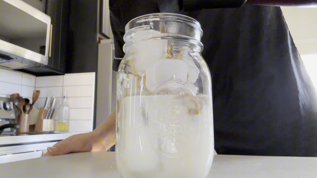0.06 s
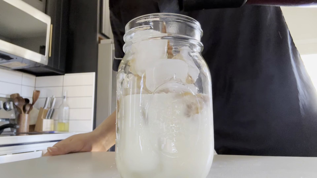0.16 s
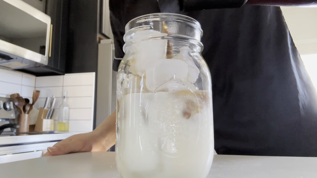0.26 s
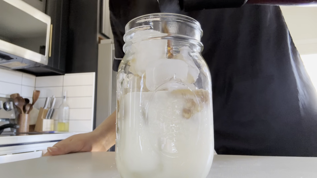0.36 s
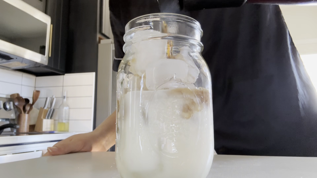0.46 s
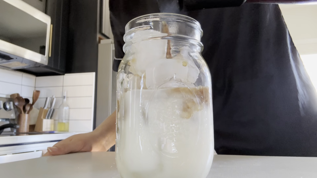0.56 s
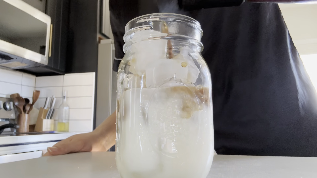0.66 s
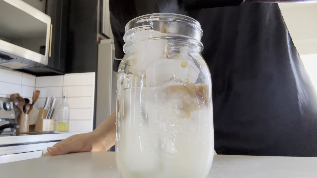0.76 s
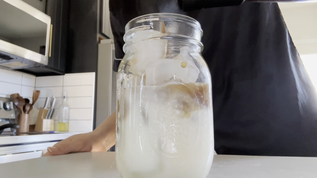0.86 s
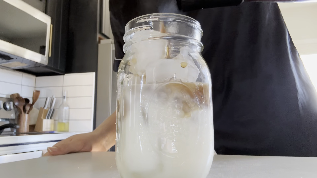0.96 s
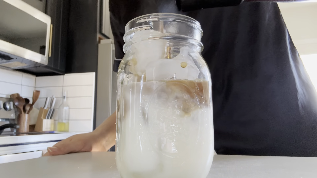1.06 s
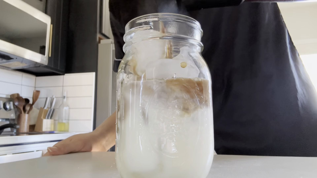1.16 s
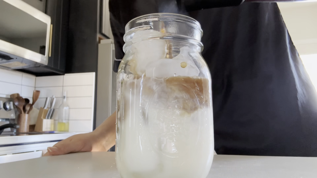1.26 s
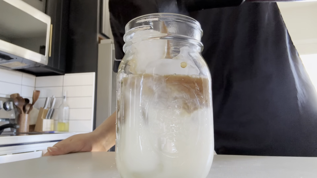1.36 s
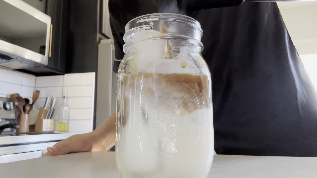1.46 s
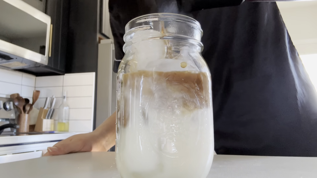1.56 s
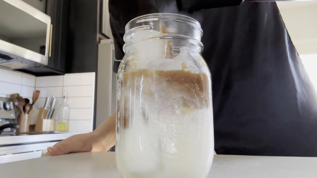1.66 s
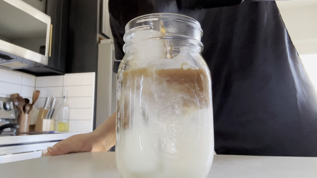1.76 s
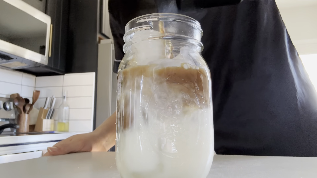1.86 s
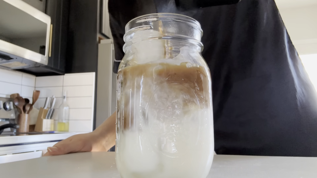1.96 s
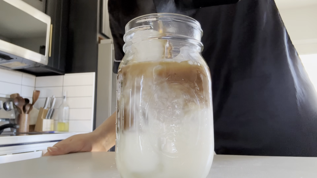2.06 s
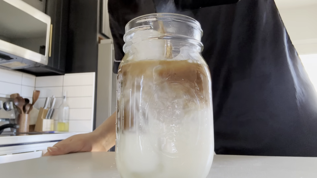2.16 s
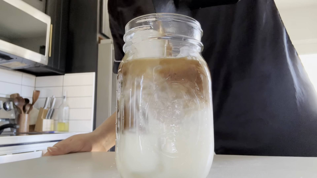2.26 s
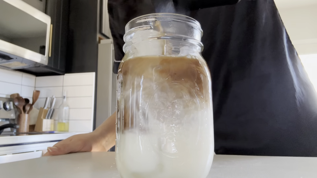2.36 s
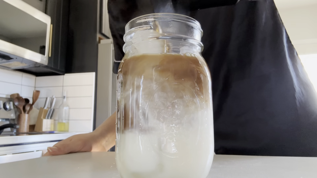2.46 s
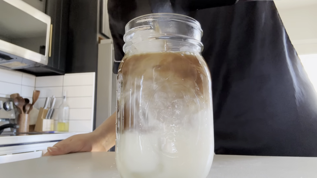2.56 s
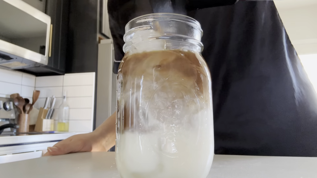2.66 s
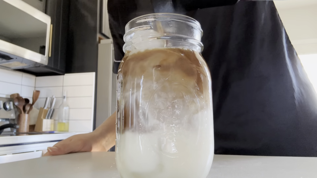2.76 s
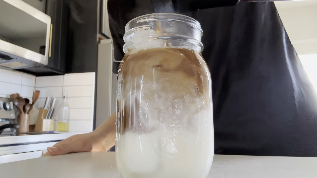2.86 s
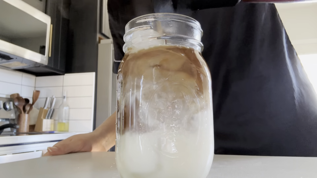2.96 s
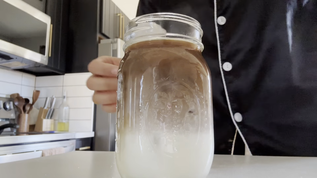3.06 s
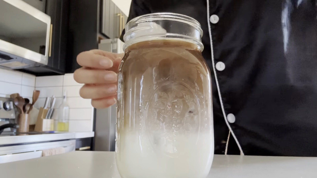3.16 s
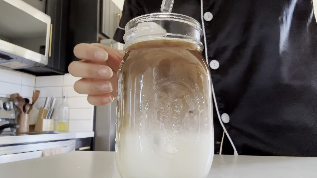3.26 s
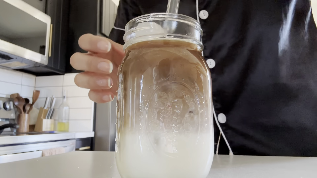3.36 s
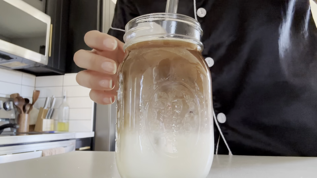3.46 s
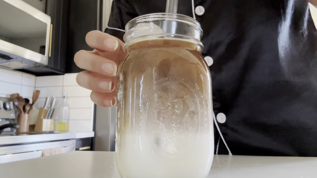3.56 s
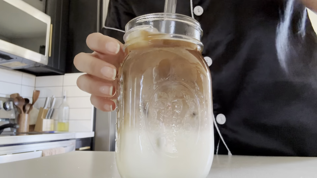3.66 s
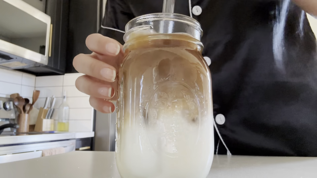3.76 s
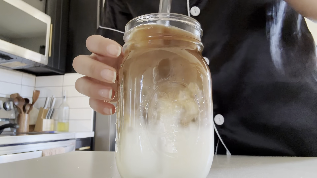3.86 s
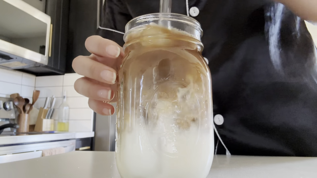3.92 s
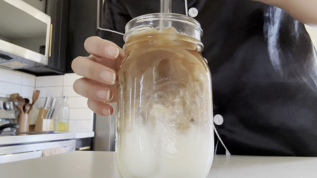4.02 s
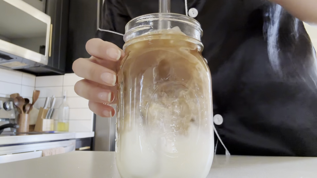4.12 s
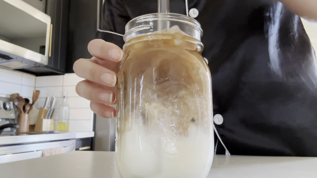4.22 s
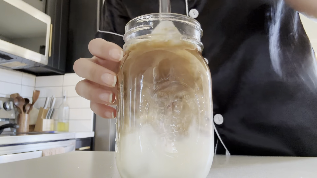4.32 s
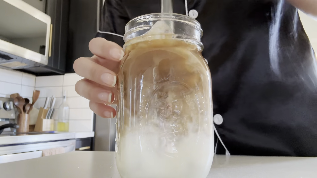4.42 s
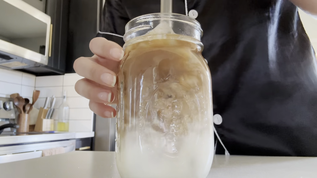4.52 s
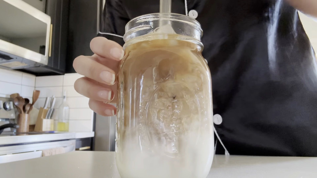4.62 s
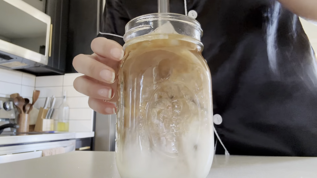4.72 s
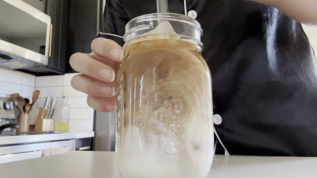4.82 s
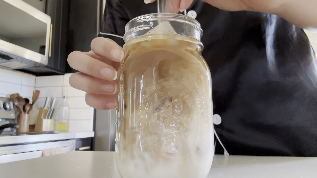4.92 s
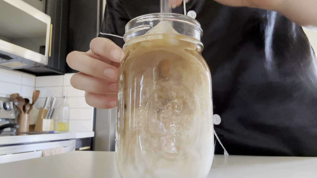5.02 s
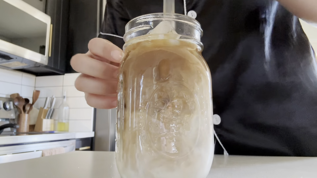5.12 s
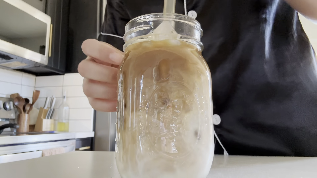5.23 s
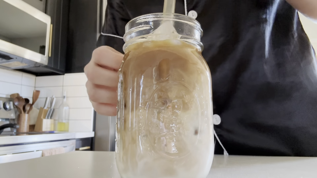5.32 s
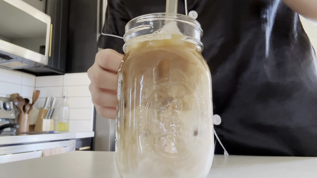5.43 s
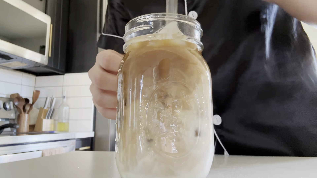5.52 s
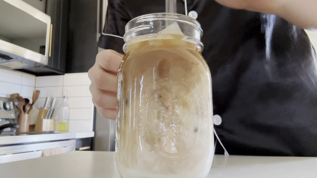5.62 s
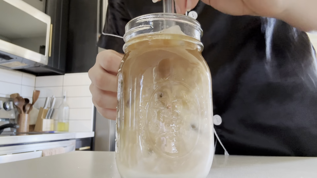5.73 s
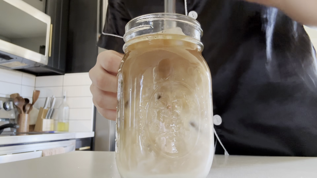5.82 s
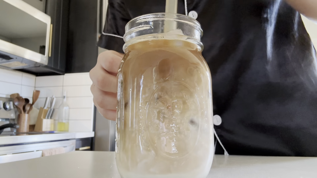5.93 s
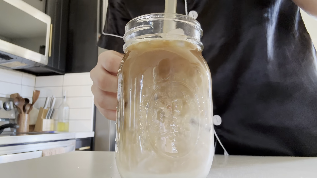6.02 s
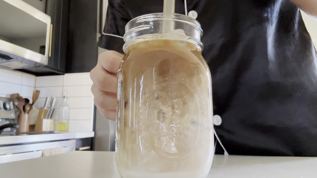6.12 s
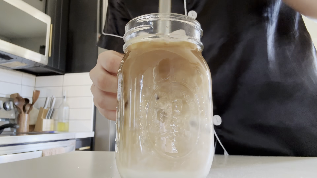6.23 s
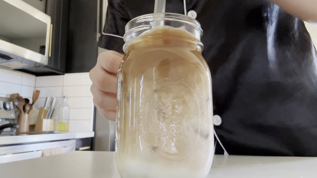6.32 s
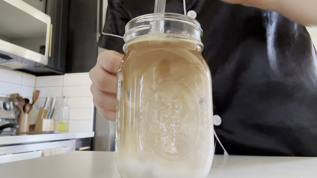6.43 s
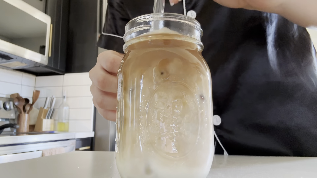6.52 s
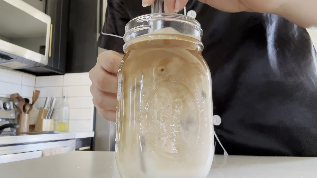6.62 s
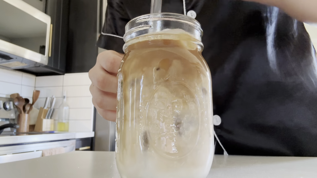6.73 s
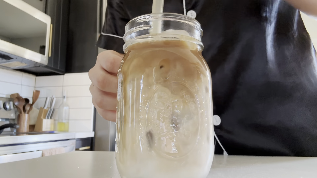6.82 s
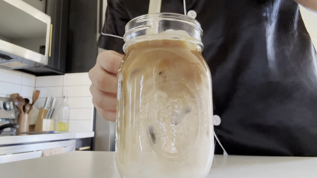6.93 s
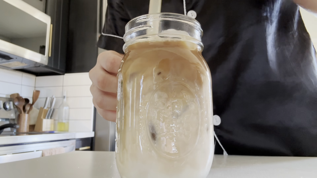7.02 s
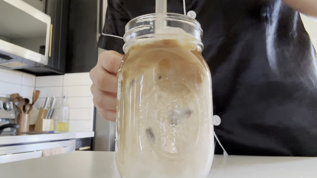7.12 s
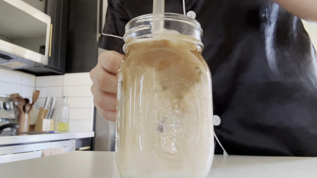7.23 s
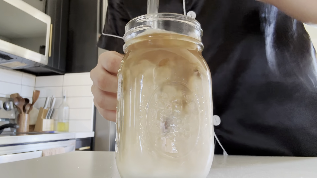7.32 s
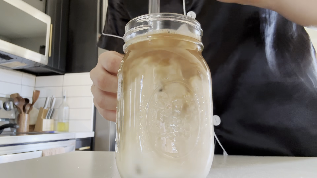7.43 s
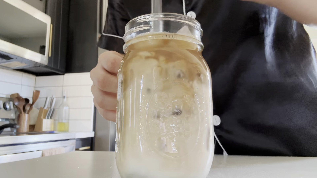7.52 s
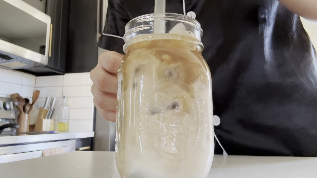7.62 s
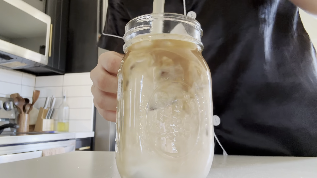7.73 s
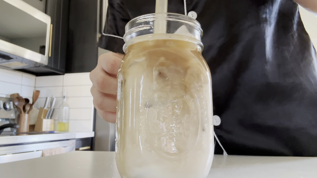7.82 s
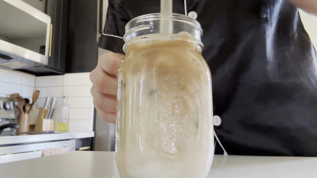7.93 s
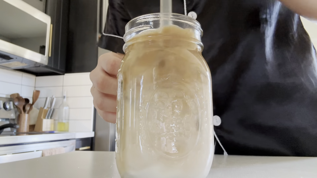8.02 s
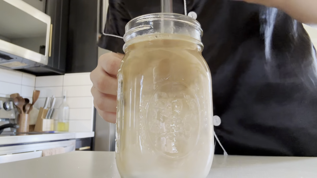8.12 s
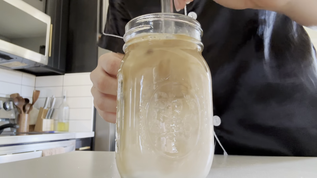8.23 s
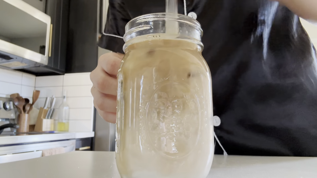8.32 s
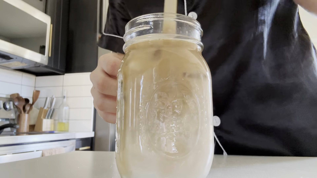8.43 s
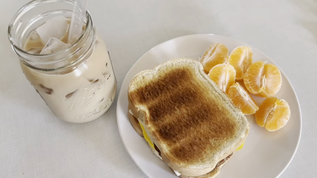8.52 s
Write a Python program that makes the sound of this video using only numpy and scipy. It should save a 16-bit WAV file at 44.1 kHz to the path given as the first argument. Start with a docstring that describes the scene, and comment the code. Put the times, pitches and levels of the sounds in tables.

```python
"""On a kitchen counter, coffee trickles in gushes over ice and milk in a glass jar; then the pot is put down.
Bubbles are decaying sines of rising pitch; the stream is noise bursts through resonances of the air space.
A glass straw stirs in short strokes: contact noise excites modes of cubes, straw, wall and jar bottom.
The jar knocks on the counter as decaying sines of falling pitch, with a boom and a clack.
Reflections in decaying noise bands make the small room ring briefly; an appliance hums in steady sines."""
import sys
import numpy as np
from scipy import signal
from scipy.fft import rfft, irfft, next_fast_len
from scipy.io import wavfile

SR = 44100
rng = np.random.default_rng(int(sys.argv[2]) if len(sys.argv) > 2 else 0)


def inscribe(sig):
    """Save sig as 16-bit PCM at rate SR to the path in sys.argv[1].

    A 1-D sig is mono; a 2-D sig holds one channel per row.
    Samples are clipped to [-1, 1] before scaling.
    """
    pcm = np.round(np.clip(np.atleast_2d(sig).T, -1, 1) * 32767)
    wavfile.write(sys.argv[1], SR, pcm.astype(np.int16))


N = 378378
TIME = np.arange(N) / SR
SHORT = np.arange(4096) / SR   # clock of a single hit, s
LEAD_S = 0.01   # contact noise peaks this long after its clock starts


def from_db(db):
    """Decibel law: amplitude ratio of a level."""
    return 10 ** (np.asarray(db) / 20)


def rms_one(x):
    """Power normalization: rms 1 over the whole signal."""
    return x / np.sqrt(np.mean(x ** 2) + 1e-20)


def energy_one(hits):
    """Energy normalization: each hit carries the energy of rms 1 lasting a hundredth of a second."""
    energy = np.mean(np.sum(hits ** 2, -1), -1)[:, None, None]
    return hits / np.sqrt(energy / (SR / 100) + 1e-20)


def peak_one(hits):
    """Peak normalization: the largest swing of each hit is 1."""
    return hits / np.abs(hits).max((1, 2), keepdims=True)


def pan(db):
    """Level-difference stereo: left exceeds right by db."""
    return from_db(np.array([[db], [-db]]) / 2)


def per_hit(rows):
    """Event columns for parallel synthesis, each shaped (events, 1, 1)."""
    return np.transpose(rows)[:, :, None, None]


def in_time(rows):
    """Linear interpolation of a table's columns along its times."""
    s, *columns = np.transpose(rows)
    return [np.interp(TIME, s, c) for c in columns]


def at_hz(points, hz, axis=1):
    """Interpolation of a table column on a logarithmic frequency scale."""
    points = np.array(points)
    return np.interp(np.log(hz + 1), np.log(points[:, 0]), points[:, axis])


def band(x, low_hz, high_hz):
    """Band-pass filtering."""
    edges = [low_hz, min(high_hz, 0.45 * SR)]
    return signal.sosfilt(signal.butter(2, edges, "band", fs=SR, output="sos"), x)


def colour(x, spectrum):
    """Spectral shaping: weight each frequency of a steady sound by its level; rms 1."""
    size = next_fast_len(N)
    hz = np.arange(size // 2 + 1) * SR / size
    shaped = irfft(rfft(x, size) * from_db(at_hz(spectrum, hz)), size)
    return rms_one(shaped[..., :N])


def resonate(x, modes):
    """Modal resonance: parallel two-pole modes with alternating signs."""
    out = 0
    for k, (hz, width, db) in enumerate(modes):
        r = np.exp(-np.pi * width / SR)
        gain = (-1) ** k * from_db(db) * (1 - r * r) / 2
        poles = [1, -2 * r * np.cos(2 * np.pi * hz / SR), r * r]
        out = out + gain * signal.lfilter([1, 0, -1], poles, x + 1e-18)
    return out


def moving_resonance(x, hz, width_hz):
    """Heterodyne filtering: shift a moving centre to zero, low-pass, shift back."""
    turn = np.exp(2j * np.pi * np.cumsum(hz) / SR)
    lowpass = signal.butter(2, width_hz / 2, fs=SR, output="sos")
    return (signal.sosfilt(lowpass, (x + 1e-12) / turn) * turn).real


def struck(hits, modes, spread):
    """Modal excitation: each hit rings the modes in its own random proportion."""
    out = 0
    for k, mode in enumerate(modes):
        share = rng.normal(1, spread, (len(hits), 1, 1))
        out = out + resonate(hits, [mode]) * share * (-1) ** k
    return out


def soften(x):
    """Wet contact damping: the highest treble of a click is reduced."""
    return signal.sosfilt(signal.ellip(5, 1, 24, 12000, fs=SR, output="sos"), x)


def contacts(count, crack_s, scatter_db, scatter_s, rise_s=0.00026):
    """Contact noise: it rises quickly to a peak at LEAD_S, with weaker chatter, independent on each side."""
    before, after = np.maximum(LEAD_S - SHORT, 0), np.maximum(SHORT - LEAD_S, 0)
    crack = np.exp(-before / rise_s - after / crack_s)
    chatter = from_db(scatter_db) * np.exp(-before / (2 * rise_s) - after / scatter_s)
    return rng.standard_normal((count, 2, len(SHORT))) * (crack + chatter)


def place(times, hits):
    """Superposition: add the hits on the time line, each clock starting LEAD_S before its time."""
    out = np.zeros((2, N + len(SHORT)))
    for s, hit in zip(np.ravel(times), hits):
        i = int(np.clip((s - LEAD_S) * SR, 0, N))
        out[:, i:i + len(SHORT)] += hit
    return out[:, :N]


def grains(per_s, spread_db):
    """Random point process: clicks of uneven size, mostly small."""
    sizes = from_db(spread_db * np.minimum(rng.exponential(1, N), 3))
    return (rng.random(N) < per_s / SR) * sizes


def crackle(per_s, spread_db, grain_s):
    """Granular noise: each random click frees a tiny burst that swells and fades; rms 1."""
    r = np.exp(-2 / (grain_s * SR))
    power = signal.lfilter([1], [1, -2 * r, r * r], grains(per_s, spread_db) ** 2 + 1e-12)
    return rms_one(np.sqrt(power) * rng.standard_normal((2, N)))


def bubbles(hz, cycles, rise):
    """Bubble resonance: a ring fades by 60 dB in some cycles as its pitch rises near the surface."""
    age = SHORT * hz / cycles
    phase = 2 * np.pi * hz * SHORT * (1 + rise * np.minimum(age, 1))
    offset = rng.normal(0, 1.0, (len(hz), 2, 1))
    attack = 1 - np.exp(-SHORT * hz * 2)
    return np.sin(phase + offset) * from_db(-60 * np.minimum(age, 4)) * attack


def swells(rows, rise_db_per_s, fall_db_per_s, rest_db):
    """Power summation of (start, length, dB) swells that rise, hold and settle; level in dB."""
    power = from_db(rest_db) ** 2
    for start, length, db in rows:
        early, late = np.maximum(start - TIME, 0), np.maximum(TIME - start - length, 0)
        level_db = db - rise_db_per_s * early - fall_db_per_s * late
        power = power + from_db(np.maximum(level_db, -120)) ** 2
    return 10 * np.log10(power)


def flicker(per_s):
    """Random modulation: straight lines between normal draws."""
    return np.interp(TIME * per_s, np.arange(1200), rng.standard_normal(1200))


# spectrum of the room air; columns: frequency_hz, relative_level_db
AIR = [(15, -4), (25, -20), (78, -9.5), (145, -11), (363, -12), (1160, -45.5), (1330, -41), (2110, -47.5),
       (4490, -45.5), (5000, -49.5), (7920, -44), (9320, -53), (11000, -39.5), (13200, -65), (16000, -64)]
# hum partials of an appliance; columns: frequency_hz, left_rms_db, right_rms_db
HUM = [(60.9, -57.5, -50), (118.3, -78, -61.5), (184, -79, -62), (236, -63.5, -76), (350, -70, -71)]
AIR_DB = -57   # rms


def background():
    """Stationary noise and steady partials: still room air and the hum of an appliance."""
    shared = 0.93 * rng.standard_normal(N)
    air = colour(rng.standard_normal((2, N)) + shared, AIR)
    hum = 0
    for hz, left, right in HUM:
        tone = np.sqrt(2) * np.sin(2 * np.pi * (hz * TIME + rng.random()))
        hum = hum + from_db([[left], [right]]) * tone
    return from_db(AIR_DB) * air + hum


# spectrum of fizzing spray and patter; columns: frequency_hz, relative_level_db
FIZZ = [(290, -43), (500, -3), (807, -57), (1050, -32), (1190, -6), (1900, 0), (3110, 2), (3700, -1),
        (4040, -20), (4340, 14), (4800, 3), (5970, 2.5), (7980, 4), (9220, -10.5), (11300, 6), (16000, -28)]
# rising resonance of the air space above the drink; columns: time_s, pitch_hz
AIR_SPACE = [(0, 905), (.6, 980), (1.1, 1090), (1.5, 1320), (2.0, 1440), (2.5, 1740), (3.1, 2210)]


def dribble():
    """Cavity excitation: a thin first thread patters on the ice between drops and sounds the air space."""
    patter = crackle(per_s=90, spread_db=4, grain_s=0.003)
    pitch, = in_time(AIR_SPACE)
    plops = from_db(-70.0) * rms_one(moving_resonance(patter, pitch, width_hz=240))
    fizz = from_db(-70.5) * colour(patter, FIZZ)
    return (plops + fizz) * (TIME > DROPS[0][0]) * (TIME < POUR_START_S)


# extra short bubbles of other sizes freed by a drop: level relative to the drop's, span of their delays
SATELLITE_DB, SATELLITE_S = -15.5, 0.012


def satellites(s, db, hz):
    """Bubble resonance: each drop frees extra short bubbles of other sizes."""
    out = 0
    for draw in rng.random((4, len(s), 3, 1, 1)):
        pitch = hz * 0.75 * 3 ** draw[:, 0]
        level = from_db(db + SATELLITE_DB - 5.1 * draw[:, 1])
        rings = level * bubbles(pitch, cycles=19, rise=0.056) * (pitch < 4600)
        out = out + place(s + LEAD_S + SATELLITE_S * draw[:, 2], rings)
    return out


# clearest single drops; columns: start_s, relative_level_db, initial_pitch_hz, relative_splash_db
DROPS = [(0.103, -24, 2900, -46), (0.14, -24, 3240, -61), (0.202, -35, 950, -58), (0.22, -37, 1000, -67),
         (0.314, -20.5, 3380, -54), (0.445, -34, 960, -78), (0.473, -33.5, 1640, -48.5),
         (0.536, -35, 1200, -47.5), (0.59, -30.5, 1640, -49), (0.608, -26.5, 1460, -59),
         (0.719, -37, 3500, -53), (0.804, -32.5, 1014, -68), (0.846, -35, 3930, -49),
         (0.933, -39, 5900, -41.5), (0.956, -44, 5700, -47), (0.984, -30, 1710, -55),
         (1.03, -29.5, 1050, -47.5), (1.063, -47, 4300, -48.5), (1.086, -24.5, 1100, -46),
         (1.114, -31, 1570, -64), (1.137, -24.5, 1070, -48), (1.224, -26, 2750, -82),
         (1.286, -20.5, 1144, -57), (1.359, -25.5, 2280, -55), (1.403, -34.5, 4400, -46),
         (1.422, -21.5, 1330, -42.5), (1.461, -41, 3100, -52), (1.488, -26, 1205, -51),
         (1.573, -29.5, 1250, -73), (1.661, -26.5, 1660, -59), (1.706, -29.5, 1030, -67),
         (1.743, -36, 1500, -62), (1.79, -36, 1440, -63), (1.825, -44, 3820, -60), (1.923, -35, 2470, -63),
         (1.939, -28, 1280, -71), (2.044, -34, 2280, -57), (2.082, -24, 2600, -47), (2.104, -42, 2240, -48),
         (2.167, -21, 3170, -65), (2.254, -31, 2280, -55), (2.285, -29, 1700, -51),
         (2.303, -28.5, 1770, -51), (2.398, -39, 2240, -60), (2.418, -40, 1570, -71),
         (2.444, -41, 2700, -57), (2.512, -26.5, 1680, -58), (2.536, -31, 1640, -59),
         (2.584, -28, 1840, -57), (2.625, -24.5, 2010, -57), (2.638, -27.5, 2740, -53),
         (2.654, -28.5, 1340, -48), (2.706, -35, 2190, -62), (2.783, -39, 1750, -68),
         (2.852, -29.5, 2120, -64), (2.902, -41, 3100, -61), (2.968, -48, 2250, -68),
         (3.017, -35, 2160, -54.5)]
# resonances of the cubes; columns: frequency_hz, width_hz, relative_level_db
ICE = [(2636, 53, -3), (3070, 130, 7.5), (3390, 440, 0.5), (4375, 200, 4.5), (5750, 520, -1.5),
       (6380, 450, 0.5), (7940, 690, -5.5)]
# resonances of the straw tip; columns: frequency_hz, width_hz, relative_level_db
PING = [(10220, 160, 14.5), (10640, 550, 10), (11220, 700, 7.5), (12060, 240, 1), (14400, 390, -12)]
SPLASH_TAIL_DB, SPLASH_TAIL_S = -28, 0.04   # fine spray before its band filter: relative level, decay


def drops():
    """Impact and cavity resonance: a drop ticks on ice, leaves a ringing bubble and sounds the air space."""
    s, db, hz, splash_db = per_hit(DROPS)
    pitch, = in_time(AIR_SPACE)
    highness = (hz / hz.max()) ** 2   # small, high drops also ring the ice
    plink = from_db(db - 7) * bubbles(hz, cycles=35, rise=0.039)
    tick = contacts(len(s), crack_s=0.00023, scatter_db=-6, scatter_s=0.0055, rise_s=0.00057)
    icy = resonate(tick, ICE) + from_db(-10.5) * resonate(tick, PING)
    spray = from_db(splash_db - 6) * energy_one(band(icy, 2300, 20000))
    tinkle = from_db(db - 11.0) * highness * energy_one(band(tick, 2900, 3280))
    gulp = contacts(len(s), crack_s=0.0028, scatter_db=-2.0, scatter_s=0.003, rise_s=0.002)
    gulps = place(s, from_db(db - 2) * gulp)
    hollow = moving_resonance(gulps, pitch, width_hz=180)
    hollow = hollow + from_db(-2.5) * moving_resonance(gulps, 1.65 * pitch, width_hz=230)
    mist = contacts(len(s), crack_s=0.0026, scatter_db=-11.5, scatter_s=SPLASH_TAIL_S)
    tail = from_db(5) * band(from_db(db + SPLASH_TAIL_DB) * mist, 2700, 3600) * highness
    splashes = place(s + 0.000892, spray + tinkle + tail)
    return place(s + LEAD_S, plink) + satellites(s, db, hz) + splashes + hollow


# reflections of the room; columns: frequency_hz, echo_level_db, t60_s
KITCHEN = [(99, 3, 0.29), (322, -8, 0.35), (800, -7, 0.079), (1740, -15, 0.43), (3170, -10, 0.26),
           (5100, -13.5, 0.13), (6940, -12.5, 0.27), (10300, -17.5, 0.22), (16000, -23, 0.15)]


def kitchen(x):
    """Reverberation by convolution: dense reflections off tiles and cupboards die band by band."""
    t = np.arange(SR * 2 // 3) / SR
    onset = np.clip((t - 0.003) / 0.0026, 0, 1)
    edges = np.geomspace(70, 18000, 17)
    white = rng.standard_normal((2, 2, len(t)))
    tail = 0
    for k, (low, high) in enumerate(zip(edges, edges[1:])):
        hz = np.sqrt(low * high)
        decay = from_db(-60 * t / at_hz(KITCHEN, hz, axis=2)) * onset
        level = from_db(at_hz(KITCHEN, hz)) / np.sqrt(np.sum(decay ** 2))
        tail = tail + level * band(white[k % 2], low, high) * decay
    return signal.fftconvolve(x, tail, axes=1)[:, :N]


POUR_START_S, POUR_END_S = 0.74, 3.04
# froth: relative level before random reductions, lowest and highest starting pitch
FROTH_DB, FROTH_LOW_HZ, FROTH_HIGH_HZ = 7, 1200, 4500


def froth(flow_db, fullness):
    """Bubble superposition: hundreds of small rings make a wet wash that grows as the jar fills."""
    at = rng.integers(int(POUR_START_S * SR), int(POUR_END_S * SR), size=640)
    draw = rng.random((len(at), 2))
    hz = FROTH_LOW_HZ * (FROTH_HIGH_HZ / FROTH_LOW_HZ) ** draw[:, 0]
    size = from_db(flow_db[at] + FROTH_DB - 9 * draw[:, 1] - 6 * draw[:, 0]) * fullness[at] ** 1.2
    rings = size[:, None, None] * bubbles(hz[:, None, None], cycles=48, rise=0.059)
    return place(at / SR + LEAD_S, rings)


# gushes of the stream; columns: start_s, length_s, relative_gurgle_db, relative_spray_db
GUSHES = [(0.834, 0.21, -57, -60), (1.06, 0.5, -51, -62.5), (1.63, 0.34, -52, -64),
          (2.054, 0.084, -51, -57.5), (2.24, 0.57, -54.5, -65), (2.727, 0.12, -64, -71),
          (2.837, 0.067, -55.5, -70)]
GUSH_RISE_DB_PER_S, GUSH_FALL_DB_PER_S = 234, 96
FLUTTER_DB, FLUTTERS_PER_S = 3, 22   # unevenness of the stream
TRICKLE_DB, HOLLOW_DB, SPLASH_DB, FIZZ_DB = 8.5, -4, -7.5, -2.5   # relative to the gushes


def pouring():
    """Cavity and bubble resonance: spatter and trapped bubbles sound as the shrinking air space rises in pitch."""
    flutter_db = FLUTTER_DB * flicker(FLUTTERS_PER_S)
    gurgle_rows = [(s, length, db) for s, length, db, _ in GUSHES]
    spray_rows = [(s, length, db) for s, length, _, db in GUSHES]
    flow_db = flutter_db + swells(gurgle_rows, GUSH_RISE_DB_PER_S, GUSH_FALL_DB_PER_S, rest_db=-81)
    spray_db = flutter_db + swells(spray_rows, GUSH_RISE_DB_PER_S, GUSH_FALL_DB_PER_S, rest_db=-97)
    pitch, = in_time(AIR_SPACE)
    fullness = pitch / pitch.max()
    spatter = crackle(per_s=120, spread_db=5, grain_s=0.0022)
    hollow = rms_one(moving_resonance(spatter, pitch, width_hz=290))
    hollow = hollow * (fullness.min() / fullness) ** 2.1
    overtone = rms_one(moving_resonance(spatter, 1.65 * pitch, width_hz=450))
    splash = rms_one(band(spatter, 180, 780)) * fullness   # more open as the level nears the rim
    at = rng.integers(int(POUR_START_S * SR), int(POUR_END_S * SR), size=260)
    draw = rng.random((len(at), 2))
    # from just below the hollow note to the smallest bubbles
    hz = (0.85 * pitch[at]) ** (1 - draw[:, 0]) * 3700 ** draw[:, 0]
    loss_db = 7.9 * draw[:, 1] + 8 * draw[:, 0] * (3.5 - fullness[at])
    size = from_db(flow_db[at] + TRICKLE_DB - loss_db)
    rings = size[:, None, None] * bubbles(hz[:, None, None], cycles=34, rise=0.06)
    trickle = place(at / SR + LEAD_S, rings)
    spray = crackle(per_s=80, spread_db=5, grain_s=0.0016)
    fizz = from_db(spray_db + FIZZ_DB) * colour(spray, FIZZ)
    body = from_db(HOLLOW_DB) * hollow + from_db(-16) * overtone + from_db(SPLASH_DB) * splash
    stream = (from_db(flow_db) * body + fizz) * (TIME > POUR_START_S) * (TIME < POUR_END_S)
    return trickle + froth(flow_db, fullness) + stream


# gliding note of the pocket bored by the stream; columns: time_s, pitch_hz, relative_level_db
GURGLE = [(1.05, 1050, -90), (1.14, 1060, -56), (1.18, 1110, -63), (1.215, 1110, -45.5), (1.265, 1220, -61),
          (1.292, 1130, -50), (1.325, 953, -47), (1.365, 1090, -45), (1.42, 1288, -61), (1.46, 1140, -47.5),
          (1.5, 1260, -51), (1.56, 1260, -72), (1.65, 1260, -90)]
BLOOP_DB, BLOOP_CYCLES, BLOOP_RISE = 6, 44, 0.11   # relative level, ring length, strength of the upward glide


def gurgling():
    """Bubble and cavity resonance: rising chirps in the pocket overlap into one gliding note."""
    hz, db = in_time(GURGLE)
    churn = crackle(per_s=210, spread_db=3.5, grain_s=0.0033)
    pocket = from_db(db - 1.0) * rms_one(moving_resonance(churn, hz, width_hz=120))
    draw = rng.random((30, 2))
    slots = np.arange(len(draw)) + draw[:, 0]
    at = (SR * np.interp(slots, [0, len(draw)], [GURGLE[0][0], GURGLE[-1][0]])).astype(int)
    pitches = (hz[at] * (0.98 + 0.12 * draw[:, 1]))[:, None, None]
    level = from_db(db[at] + BLOOP_DB)[:, None, None]
    bloops = level * bubbles(pitches, cycles=BLOOP_CYCLES, rise=BLOOP_RISE)
    return pocket + place(at / SR + LEAD_S, bloops)


def rustle():
    """Band-limited noise: a soft swish as the pot is swung away."""
    swell = np.exp(-((TIME - 3.125) / 0.037) ** 2)
    return from_db(-63.5) * swell * rms_one(band(rng.standard_normal((2, N)), 2800, 9500))


# touches of the pot; columns: start_s, relative_level_db
POT_TOUCHES = [(3.288, -34.5), (3.298, -29), (3.312, -39), (3.333, -34.5), (3.35, -42)]
# resonances of the pot; columns: frequency_hz, width_hz, relative_level_db
POT = [(214, 135, 9.5), (460, 53, 19), (724, 99, 4.5), (905, 330, -2)]


def pot_down():
    """Modal excitation by contact noise: a dull, scuffing bump as the pot touches down."""
    s, db = per_hit(POT_TOUCHES)
    scuff = contacts(len(s), crack_s=0.0024, scatter_db=-13, scatter_s=0.092, rise_s=0.00071)
    return place(s, from_db(db - 6.0) * energy_one(band(resonate(scuff, POT), 110, 1200)))


# the straw brushes the rim; columns: start_s, relative_level_db, pitch_hz
RIM_TOUCHES = [(3.4475, -40.5, 10400), (3.491, -35.5, 10300), (3.5077, -41, 10260), (3.886, -32, 10800),
               (4.593, -41, 9850), (5.3084, -45, 10300), (5.3467, -43, 10400), (5.3925, -47.5, 10400),
               (5.45, -41, 10200), (6.028, -42, 10000), (7.3, -36, 10600), (7.8345, -20.5, 10300),
               (7.8388, -17.5, 10200), (7.8481, -19.5, 10400)]
# resonances that sound with the ping; columns: frequency_hz, width_hz, relative_level_db
RIM = [(6510, 180, 13), (14350, 240, -22)]


def rim_pings():
    """Modal resonance: the glass straw grazes the rim and rings very high, at a pitch for each touch."""
    s, db, hz = per_hit(RIM_TOUCHES)
    crack = contacts(len(s), crack_s=0.0002, scatter_db=-21, scatter_s=0.0029, rise_s=0.0011)
    rings = [resonate(resonate(c, [(f, 220, 0)]), [(f, 900, 0)]) for c, f in zip(crack, hz.ravel())]
    ping = from_db(db - 6.5) * energy_one(np.array(rings))
    rim = from_db(db - 9.0) * energy_one(resonate(crack, RIM))
    tick = from_db(db - 8.0) * energy_one(band(resonate(crack, ICE), 1470, 7000))
    return place(s + 0.0012, ping + rim + tick)


STIR_START_S = 3.45


def while_stirring(effort_db, per_s, spread_db):
    """Jittered event process: uneven contact times, with levels in dB that follow the effort."""
    draw = rng.random((300, 2))
    s = STIR_START_S + (np.arange(len(draw)) + draw[:, 0]) / per_s
    db = np.interp(s, TIME, effort_db) + spread_db * np.sqrt(3) * (2 * draw[:, 1] - 1)
    return s[s < TIME[-1]], db[s < TIME[-1]]


# shoves that knock the jar; columns: start_s, relative_level_db, nominal_pitch_hz, rocking_decay_s
KNOCKS = [(3.448, -37.5, 363, 0.0046), (3.489, -17, 373.5, 0.0039), (3.611, -13, 374.4, 0.0037),
          (3.744, -19.5, 376, 0.0051), (3.776, -20.5, 327, 0.0042), (3.805, -18, 400, 0.005),
          (3.832, -10.5, 386, 0.0017), (3.854, -18.5, 327, 0.0035), (3.92, -12.5, 356, 0.005),
          (3.996, -27, 410, 0.0025), (4.267, -26.5, 334, 0.0092), (4.279, -26, 348, 0.0073),
          (4.594, -32, 355, 0.0042), (4.629, -33.5, 355, 0.0049), (4.719, -25.5, 348, 0.0023),
          (4.747, -12.5, 344, 0.0053), (4.815, -22, 333, 0.004), (4.881, -4, 365.5, 0.0056),
          (5.347, -35.5, 344, 0.014), (5.394, -36, 355, 0.0078), (5.466, -25, 382, 0.0044),
          (5.503, -23, 356, 0.0048), (5.582, -21, 264, 0.0071), (5.678, -6, 356, 0.0035),
          (6.189, -23.5, 292, 0.0036), (6.215, -23, 390, 0.0034), (6.256, -15.5, 333, 0.0047),
          (6.314, -21, 381, 0.0046), (6.331, -22, 390, .004), (6.355, -24.5, 350, 0.0036),
          (6.383, -11, 366, 0.0045), (6.447, -24.5, 343, 0.0048), (6.492, -27.5, 390, 0.0035),
          (6.58, -9, 291, 0.004), (7.011, -16, 327, .0045), (7.038, -18, 327, 0.0048),
          (7.066, -23, 360, 0.0049), (7.089, -11, 373, 0.007), (7.132, -19.5, 398, 0.0066),
          (7.157, -13, 347, 0.0059), (7.251, -13, 288, 0.0025), (7.352, -10.5, 316, 0.0028),
          (7.401, -15, 276, 0.0023), (7.822, -15, 340, 0.0033), (7.843, -16, 403, 0.0062),
          (7.888, -20, 347, 0.0089), (7.94, -27, 350, .004), (7.956, -24, 350, 0.0034),
          (8.014, -13, 377, 0.0079), (8.201, -6, 363, 0.0094), (8.464, -35, 347, 0.0036)]
# resonances of the counter; columns: frequency_hz, width_hz, relative_level_db
COUNTER = [(131.3, 51, -6), (245, 54, 0.5), (346, 58, 0.5), (413, 128, -0.5), (475, 95, -2),
           (610, 103, -1.5)]
# resonances of the jar base; columns: frequency_hz, width_hz, relative_level_db
CLACK = [(737, 240, 0.5), (927, 168, 2), (1058, 163, 4), (1180, 1270, -4)]
CLACK_DB, CLACK_GROWTH = -25, 1.02   # harder knocks clack disproportionately: offset, dB per dB
BRIEF_ROCK_S = 0.0022   # rocking decay of wobbles and rebounds
REBOUND_ABOVE_DB, REBOUND_S, REBOUND_LOSS_DB = -8.5, 0.00905, 15   # the hardest knocks bounce once
WOBBLES_PER_S, WOBBLE_DB, WOBBLE_HZ = 8, 7.5, 348   # slight rocking, relative to the effort; nominal pitch


def knocks(effort_db):
    """Damped oscillation: the heavy jar rocks, slowing as contact eases, and excites counter and base modes."""
    times, levels = while_stirring(effort_db, WOBBLES_PER_S, spread_db=-0.5)
    wobbles = [(s, db + WOBBLE_DB, WOBBLE_HZ, BRIEF_ROCK_S) for s, db in zip(times, levels)]
    rebounds = [(s + REBOUND_S, db - REBOUND_LOSS_DB, hz, BRIEF_ROCK_S)
                for s, db, hz, _ in KNOCKS if db > REBOUND_ABOVE_DB]
    s, db, hz, rock_s = per_hit(list(KNOCKS) + rebounds + wobbles)
    age = np.maximum(SHORT - LEAD_S, 0)
    cycles = hz * (0.899 * age + 0.0017 * (1 - np.exp(-age / 0.0033)))
    swing = -np.sin(2 * np.pi * cycles) * (1 - np.exp(-age / 0.0041)) * np.exp(-age / rock_s)
    rumble = 0.09 * contacts(len(s), crack_s=0.021, scatter_db=-1, scatter_s=0.021)
    push = (age > 0) * np.exp(-age / 0.00051) + rumble
    deep = from_db(-22.0) * band(push, 42, 107)
    boom = -band(struck(push, COUNTER, spread=0.64) + deep, 50, 1240)
    crack = contacts(len(s), crack_s=0.00042, scatter_db=-3, scatter_s=0.0023)
    clack = energy_one(band(resonate(crack, CLACK), 330, 3100))
    thud = from_db(db - 4.5) * peak_one(swing) * pan(6.8)
    thud = thud + from_db(db - 5.0) * peak_one(boom) * pan(3.3)
    return place(s + 0.001, thud + from_db(CLACK_DB + CLACK_GROWTH * db) * clack * pan(1.0))


def cube_rings(count, low_hz, high_hz, t60):
    """Additive synthesis: every cube rings at three random pitches of its own."""
    out = 0
    for draw in rng.random((3, count, 3, 1)):
        hz = low_hz * (high_hz / low_hz) ** draw[:, :1]
        out = out + np.sin(2 * np.pi * hz * SHORT + 2 * np.pi * draw[:, 1:])
    fade_s = np.where(SHORT < LEAD_S, 0.003, t60)
    return out * from_db(-60 * np.abs(SHORT - LEAD_S) / fade_s)


# pushes of the straw through the ice; columns: start_s, length_s, relative_effort_db, relative_slosh_db
STROKES = [(3.69, 0.076, -40, -39.5), (3.775, 0.14, -35.5, -36.5), (4.244, 0.028, -38, -42.5),
           (4.767, 0.023, -40.5, -44.5), (5.463, 0.22, -42, -43), (6.247, 0.28, -36.5, -42.5),
           (7.043, 0.35, -29.5, -38), (7.843, 0.077, -26.5, -39), (8.153, 0.091, -39, -46.5),
           (8.44, 0.054, -48, -49)]
# spectrum of scraping cubes; columns: frequency_hz, relative_level_db
GRIND = [(410, -13), (700, -13), (1200, -7.5), (1400, -18), (1800, -1.5), (1940, -5.5), (2730, -11.5),
         (3070, -6), (3740, -11), (4380, -5), (4920, -23), (6320, -14), (9230, -31.5), (10200, -21),
         (11500, -28), (16000, -49)]
# resonances of the jar wall; columns: frequency_hz, width_hz, relative_level_db
WALL = [(1155, 86, -3), (1777, 75, 11.5), (2067, 180, 3), (2059, 267, 5.5)]
PUSH_DB_PER_S, SETTLE_DB_PER_S = 357, 75   # the cubes get moving fast and settle slowly
DRIFT_DB = -58.5   # effort floor: once the straw is in, the cubes never quite rest
SLOSH_SETTLE_DB_PER_S, SLOSH_REST_DB = 45.5, -51   # the drink keeps moving longer than the cubes
CLUMP_DB, CLUMPS_PER_S = 4.5, 55   # stick and slip: scraping comes in clusters
TAP_DB, TAP_T60_S = -6.5, 0.023   # strongest glassy taps between cubes relative to the effort; ring time


def stirring(effort_db):
    """Stick-slip friction: swarms of tiny contacts scrape along the wall while the drink sloshes."""
    slosh_rows = [(s, length, db) for s, length, _, db in STROKES]
    slosh_db = swells(slosh_rows, PUSH_DB_PER_S, SLOSH_SETTLE_DB_PER_S, SLOSH_REST_DB)
    scrape = crackle(per_s=420, spread_db=6, grain_s=0.0007)
    scrape = rms_one(scrape * from_db(CLUMP_DB * flicker(CLUMPS_PER_S)))
    bumps = scrape + crackle(per_s=210, spread_db=6.0, grain_s=0.00035)
    grind = from_db(-4) * colour(scrape, GRIND) + from_db(-18.5) * rms_one(resonate(bumps, WALL))
    slosh = resonate(bumps, COUNTER) + from_db(1.0) * resonate(bumps, CLACK)
    slosh = rms_one(band(slosh, 236, 797))
    at = rng.integers(int(STIR_START_S * SR), N, size=480)
    tap_db = effort_db[at] + TAP_DB + rng.uniform(-18, 0, len(at))
    rings = cube_rings(count=len(at), low_hz=1700, high_hz=6220, t60=TAP_T60_S)
    taps = from_db(tap_db)[:, None, None] * energy_one(rings)
    swirl = from_db(effort_db) * grind + from_db(slosh_db) * slosh
    return swirl * pan(0.93) * (TIME > STIR_START_S) + place(at / SR, taps)


# weaker bursts: strongest level, spread of their times before and after the clink's peak
BURST_DB, SPREAD_BEFORE_S, SPREAD_AFTER_S = -9.5, 0.00407, 0.016


def scattered_bursts(count):
    """Random scattering in time: three weaker noise bursts lie about each clink's peak."""
    out = 0
    for draw in rng.random((3, count, 2, 1)):
        at = LEAD_S - SPREAD_BEFORE_S + (SPREAD_BEFORE_S + SPREAD_AFTER_S) * draw[:, :1]
        level = from_db(BURST_DB - 9.7 * draw[:, 1:])
        out = out + level * np.exp(-np.abs(SHORT - at) / 0.00021)
    return out * rng.standard_normal((count, 2, len(SHORT)))


# packed cubes shoved under the surface; columns: start_s, relative_level_db, settled_pitch_hz
CLONKS = [(3.49, -24.5, 604), (3.508, -32, 600), (3.612, -19.5, 603), (3.671, -28.5, 610),
          (3.707, -34, 557), (3.774, -25.5, 713), (3.811, -32, 1020), (3.828, -23.5, 620),
          (3.857, -27.5, 623), (3.946, -35, 616), (4.004, -30, 866), (4.049, -37.5, 700), (4.071, -34, 717),
          (6.698, -32, 626)]
CLONK_S, CLONK_DROP = 0.004, 0.055   # decay; share of pitch by which the note starts high


def clonks():
    """Fluid damping: the drink leaves the cubes a short hollow note that sags slightly."""
    s, db, hz = per_hit(CLONKS)
    age = np.maximum(SHORT - LEAD_S, 0)
    cycles = hz * (age + CLONK_DROP * CLONK_S * (1 - np.exp(-age / CLONK_S)))
    note = np.sin(2 * np.pi * cycles) * (1 - np.exp(-age / 0.0034)) * np.exp(-age / CLONK_S)
    return place(s + 0.00065, from_db(db) * peak_one(note) * pan(4.0))


# clearest clinks of ice on glass; columns: start_s, relative_wall_db, hardness_db
CLINKS = [(3.491, -30.5, 3.5), (3.5077, -28.5, 4), (3.6103, -23.5, -5), (3.6412, -29.5, 5),
          (3.6458, -37, 12.5), (3.6738, -25.5, -5), (3.712, -30, -8), (3.7434, -25.5, -4),
          (3.7714, -25.5, -2.5), (3.8051, -20.5, 0.5), (3.831, -23, -3.5), (3.8397, -23, 6.5),
          (3.856, -28.5, 10.5), (3.886, -37, 2), (3.9045, -33.5, 3), (3.925, -34, 12), (3.942, -36.5, -3),
          (4.004, -27.5, -3.5), (4.023, -33.5, -27), (4.048, -35, -19), (4.064, -30.5, -19),
          (4.119, -34, -17), (4.2318, -25, -11), (4.2488, -41, 3), (4.2675, -31, 4.5), (4.296, -32.5, 5),
          (4.3115, -32.5, 5), (4.324, -30, 0.5), (4.3352, -24.5, 2), (4.3499, -28, -5), (4.375, -34, -0.5),
          (4.4098, -27, -16), (4.427, -31.5, -4), (4.5168, -37, 5.5), (4.543, -33.5, -5), (4.593, -33.5, 2),
          (4.6298, -35.5, 7.5), (4.682, -44, 4), (4.718, -41, 7.5), (4.7472, -23.5, 6.5),
          (4.806, -29.5, 3.5), (4.8136, -38, 4), (4.845, -25.5, -9), (4.869, -26, -1), (4.8806, -19, 5.5),
          (5.0563, -42.5, -24), (5.1282, -46, -23), (5.1786, -49.5, 2), (5.248, -39.5, -9),
          (5.3084, -24, -15), (5.3467, -40, 11.5), (5.364, -38.5, -1), (5.3925, -39, 9.5),
          (5.45, -33.5, 6.5), (5.467, -20.5, -12), (5.5045, -32.5, 6.5), (5.5737, -33.5, 2),
          (5.586, -30, -5), (5.602, -32, -9), (5.649, -30, -11), (5.677, -22, 8), (5.7835, -25, -8),
          (5.797, -35, -8), (5.839, -36.5, -12), (5.862, -34.5, -21), (5.8875, -44, 11.5),
          (6.027, -35.5, 1), (6.04, -31.5, -12), (6.133, -35.5, -12.5), (6.164, -41, -27),
          (6.188, -35.5, -2.5), (6.2204, -19.5, -4.5), (6.2305, -33, -3), (6.2415, -24, 3),
          (6.2515, -22, 4.5), (6.2731, -26, 5.5), (6.2995, -29, -4), (6.3124, -31.5, 10), (6.332, -22, 6),
          (6.354, -31.5, 10.5), (6.3839, -22.5, 0), (6.396, -25.5, 4), (6.412, -23, -3), (6.42, -25, -13),
          (6.4453, -27.5, 2.5), (6.466, -32, 3), (6.4933, -15.5, -7), (6.503, -17, -16), (6.535, -33, -1),
          (6.562, -23.5, -9), (6.5788, -23.5, 11), (6.623, -27.5, -15), (6.667, -31, -9),
          (6.6979, -21.5, -10), (6.8139, -31.5, -4.5), (6.8768, -27.5, -8), (6.895, -31, -8),
          (6.977, -35.5, -6), (7.012, -17.5, -2.5), (7.0393, -21.5, 1.5), (7.053, -22.5, 5),
          (7.068, -29, 4), (7.092, -25, 10), (7.1147, -18.5, 1), (7.126, -28, -2), (7.1401, -28.5, 7),
          (7.1564, -28.5, 2), (7.174, -33, -12), (7.207, -21.5, -8), (7.2195, -23, -2), (7.2568, -27, 6),
          (7.276, -25, 4), (7.301, -33, 2), (7.3136, -22, -13), (7.3384, -27, 1), (7.3567, -29.5, 11),
          (7.4063, -22.5, 2), (7.424, -28.5, 9.5), (7.458, -34, 2), (7.4751, -27.5, -1),
          (7.5044, -22.5, -16), (7.523, -34.5, 11.5), (7.545, -45, 6), (7.591, -36, -4), (7.61, -34.5, 4.5),
          (7.6245, -31.5, 2), (7.665, -34, -20), (7.7056, -23, -8.5), (7.731, -35.5, 4), (7.8032, -29, -10),
          (7.8388, -14, -4), (7.849, -22, 2), (7.8639, -19, 0.5), (7.8881, -26, 2), (7.912, -20, -16),
          (7.9213, -27.5, 5), (7.948, -38, 6), (7.9565, -22.5, -3), (7.97, -34, -5), (8.0155, -23, -2),
          (8.0345, -22, -2.5), (8.064, -39, 11), (8.125, -27.5, -11), (8.2001, -18, 1), (8.2301, -24.5, 4),
          (8.3213, -29, -9), (8.3773, -37, 2.5), (8.425, -33.5, -12), (8.464, -33.5, -6),
          (8.4988, -25, -18)]
JOSTLES_PER_S, JOSTLE_DB, JOSTLE_SPREAD_DB = 16, -7.5, 4   # small random clinks, relative to the effort
JOSTLE_HARDNESS_DB = (-12, 4)   # range of hardness of chance contacts
PING_PER_HARDNESS, SNAP_PER_HARDNESS = 0.83, 0.63   # dB per dB
TICK_DB, TICK_PER_HARDNESS = -14.5, 0.98   # bare click relative to the wall: dB, dB per dB


def clinks(effort_db):
    """Contact stiffness: each contact rings the wall, and harder ones ring cubes and straw more brightly."""
    times, levels = while_stirring(effort_db, JOSTLES_PER_S, JOSTLE_SPREAD_DB)
    hardness = rng.uniform(*JOSTLE_HARDNESS_DB, len(times))
    jostles = np.column_stack([times, levels + JOSTLE_DB, hardness])
    s, wall_db, hardness_db = per_hit(np.vstack([CLINKS, jostles]))
    ice_db = wall_db + hardness_db
    bursts = scattered_bursts(len(s))
    rub = bursts + contacts(len(s), crack_s=0.00016, scatter_db=-14.0, scatter_s=0.011, rise_s=0.00076)
    crack = bursts + contacts(len(s), crack_s=0.000086, scatter_db=-18.0, scatter_s=0.0053, rise_s=0.00073)
    wall = from_db(wall_db - 6.0) * energy_one(band(struck(rub, WALL, spread=0.73), 460, 3200))
    ice = from_db(ice_db - 9.0) * energy_one(band(struck(crack, ICE, spread=0.35), 1540, 8100))
    rings = cube_rings(count=len(s), low_hz=2352, high_hz=6700, t60=0.045)
    cubes = from_db(ice_db - 14.0) * energy_one(rings)
    ping_db = wall_db + PING_PER_HARDNESS * hardness_db - 26.0
    ping = from_db(ping_db) * energy_one(band(resonate(crack, PING), 11900, 16000))
    jolt = contacts(len(s), crack_s=0.0013, scatter_db=-19, scatter_s=0.00122, rise_s=0.00023)
    snap_db = wall_db + SNAP_PER_HARDNESS * hardness_db + 4.5
    snap = from_db(snap_db) * peak_one(band(jolt, 530, 3900))
    click = contacts(len(s), crack_s=0.000073, scatter_db=-31, scatter_s=0.002, rise_s=0.0001)
    tick_db = wall_db + TICK_PER_HARDNESS * hardness_db + TICK_DB
    tick = from_db(tick_db) * peak_one(soften(band(click, 2400, 14500)))
    return place(s + 0.001178, wall + ice + cubes + ping + snap + tick) * pan(1.0)


# tones of the rubbed wall; columns: frequency_hz, width_hz, relative_level_db
SINGING = [(1778, 52, 5), (3076, 180, -9), (4250, 340, -15.5)]
SING_DB, SING_SETTLE_DB_PER_S, SING_REST_DB = -6.5, 64, -88   # offset applied to the effort and its floor


def singing():
    """Friction-driven resonance: steady rubbing keeps the glass wall sounding between the knocks."""
    rows = [(s, length, db) for s, length, db, _ in STROKES]
    rub_db = swells(rows, PUSH_DB_PER_S, SING_SETTLE_DB_PER_S, SING_REST_DB)
    tones = rms_one(resonate(crackle(per_s=410, spread_db=10.5, grain_s=0.0012), SINGING))
    return from_db(rub_db + SING_DB) * tones * (TIME > STIR_START_S)


# the straw hits the jar bottom; columns: start_s, clang_db, clang_pitch_ratio, bright_ring_db, crack_db,
# lingering_ring_db
STRIKES = [(4.749, -45, 0.9, -45, -46, -54), (4.881, -22, 0.95, -25, -10.5, -39.5),
           (5.679, -27, 0.95, -24, -20, -45), (6.580, -20, 1.017, -28.5, -41, -48),
           (8.202, -19.5, 0.98, -28, -23, -48)]
# resonances of the jar bottom; columns: frequency_hz before the pitch ratio, width_hz, relative_level_db
BOTTOM = [(1132, 75, 14), (1292, 85, 9), (1520, 42, 4), (2890, 42, 2), (3130, 43, -21.5)]
# resonances of the straw; columns: frequency_hz, width_hz, relative_level_db
STRAW = [(4870, 510, 6), (5050, 170, 15), (5270, 620, 8.5), (10800, 450, -13), (12280, 160, 2)]
# spectrum of the lingering ring; columns: frequency_hz, relative_level_db
LINGER = [(900, -40), (2400, 3.5), (3900, -12.5), (5400, 6), (7000, -15.5), (9500, -32), (11000, -13.5),
          (13000, -36)]
RING_ON_S = 0.066   # decay of the straw after the blow


def strikes():
    """Impact excitation: the straw on thick glass gives a crack, a clang and a bright ring that lingers."""
    s, clang_db, ratio, ring_db, crack_db, _ = per_hit(STRIKES)
    crack = band(contacts(len(s), crack_s=0.00037, scatter_db=-30, scatter_s=0.0036), 10000, 11400)
    landings = contacts(len(s), crack_s=0.0017, scatter_db=-7, scatter_s=0.0022)
    clangs = []
    for hit, r in zip(landings, ratio.ravel()):
        clangs.append(resonate(hit, [(hz * r, width, db) for hz, width, db in BOTTOM]))
    clang = band(np.array(clangs), 780, 4300)
    jolt = contacts(len(s), crack_s=0.0024, scatter_db=-43.0, scatter_s=0.05)
    ring = band(resonate(jolt, STRAW), 4200, 12500)
    blow = from_db(crack_db) * peak_one(soften(crack))
    blow = blow + from_db(clang_db) * energy_one(clang) + from_db(ring_db) * energy_one(ring)
    fading = 0
    for at, *_, db in STRIKES:
        fading = fading + from_db(db) * (TIME > at) * np.exp(-np.abs(TIME - at) / RING_ON_S)
    return place(s + 0.000982, blow) + fading * colour(rng.standard_normal((2, N)), LINGER)


# resonances of the whole glass; columns: frequency_hz, width_hz, relative_level_db
GLASS = [(1777, 45, -4), (1980, 43, -21), (3020, 48, -22), (4250, 60, -6), (6300, 44, -23), (10400, 83, 4)]


def scene():
    """Superposition and sympathetic resonance: stirring contacts ring the glass; the kitchen surrounds all."""
    effort_rows = [(s, length, db) for s, length, db, _ in STROKES]
    effort_db = swells(effort_rows, PUSH_DB_PER_S, SETTLE_DB_PER_S, DRIFT_DB)
    ice = clinks(effort_db) + rim_pings() + stirring(effort_db)
    delayed = np.pad(ice, ((0, 0), (SR // 500, 0)))[:, :N]   # the ring builds up just after the touch
    ringing = resonate(delayed, GLASS)
    coffee = dribble() + pouring() + gurgling() + drops() + rustle() + pot_down()
    stirred = from_db(-2.27) * ice + from_db(-11.5) * ringing + singing()
    near = coffee + stirred + knocks(effort_db) + clonks() + strikes()
    return near + kitchen(near) + background()


CUTOFF_HZ = 16300


def record(dry):
    """Saturation and low-pass filtering: the highest peaks are rounded and the top is cut."""
    rounded = dry / (1 + (dry / 0.92) ** 8) ** (1 / 8)
    return signal.sosfilt(signal.ellip(10, 0.1, 80, CUTOFF_HZ, fs=SR, output="sos"), rounded)


dry = scene()
out = record(dry)
inscribe(out)
```